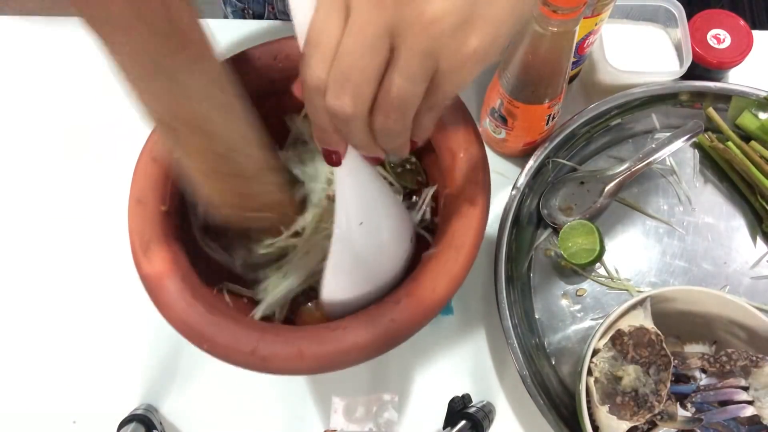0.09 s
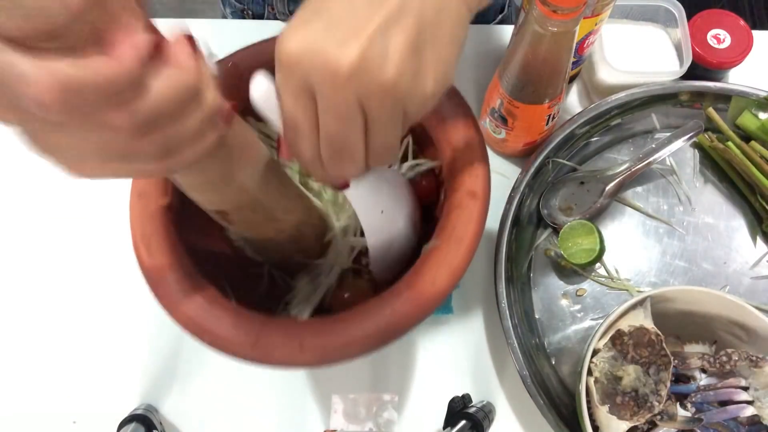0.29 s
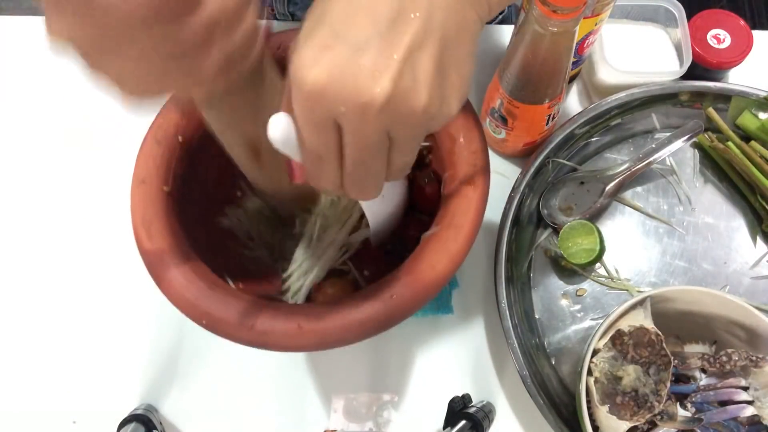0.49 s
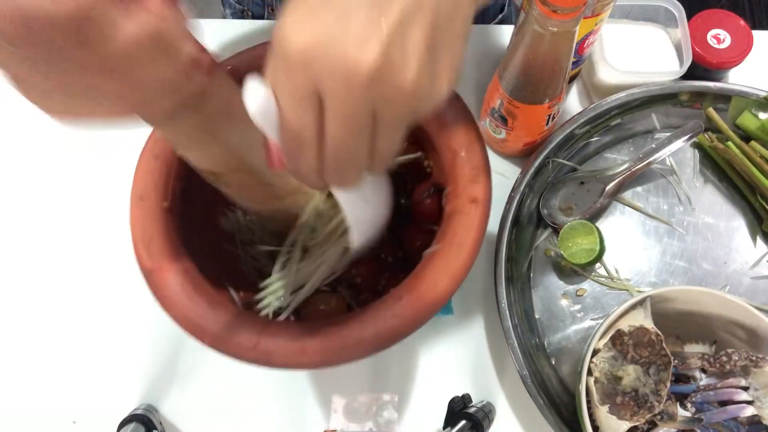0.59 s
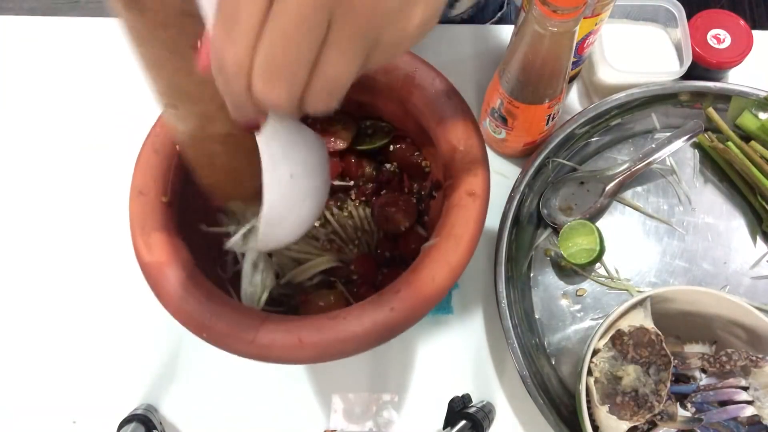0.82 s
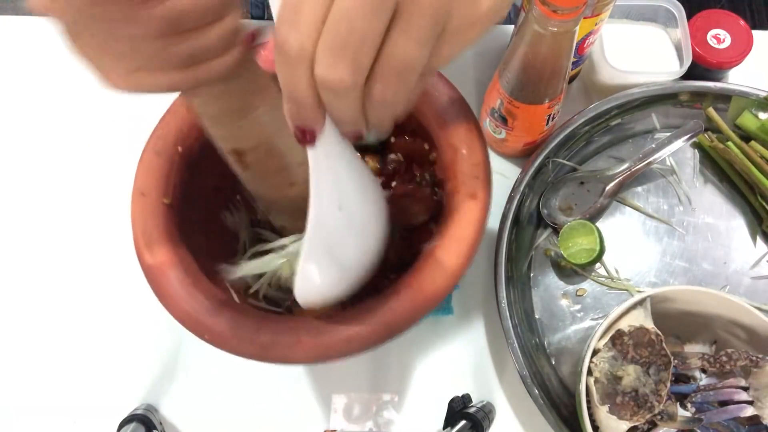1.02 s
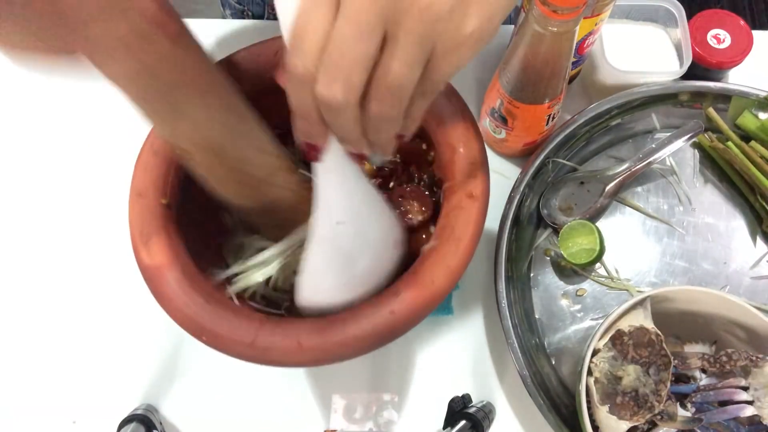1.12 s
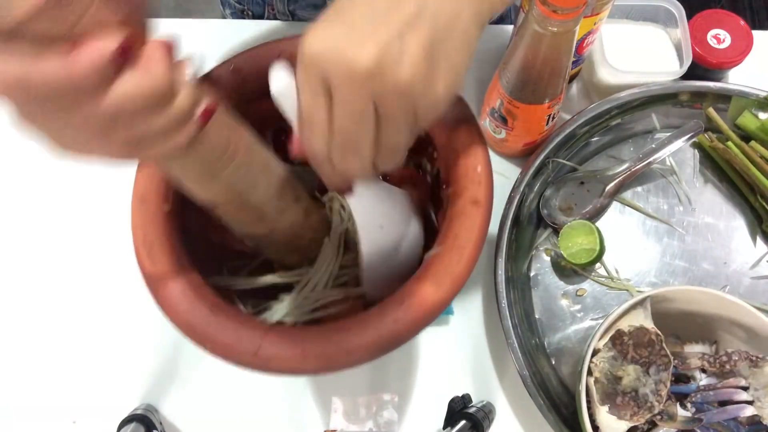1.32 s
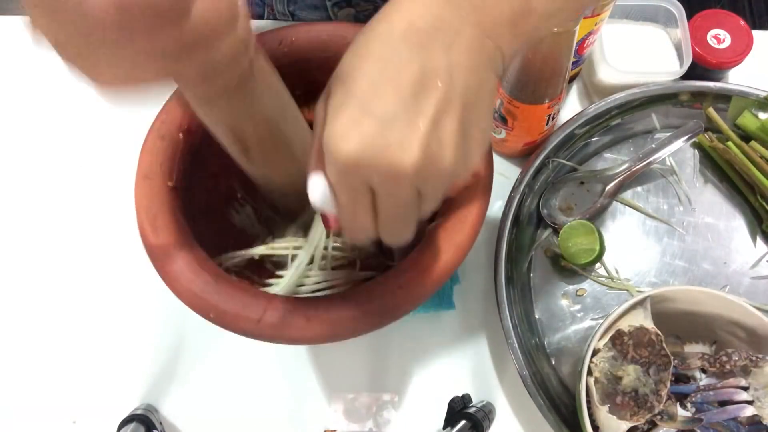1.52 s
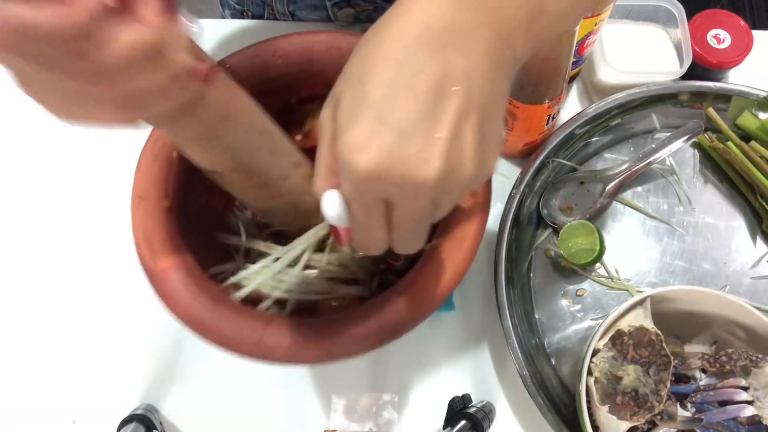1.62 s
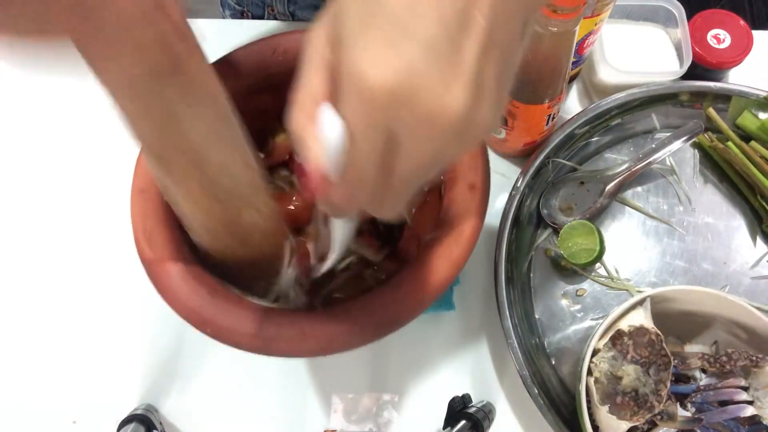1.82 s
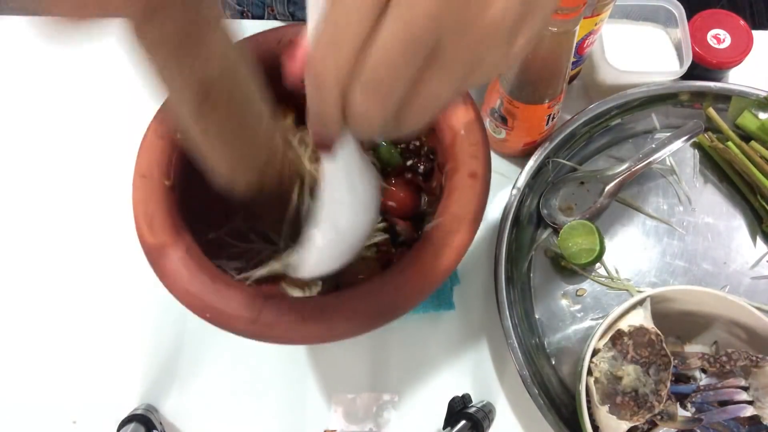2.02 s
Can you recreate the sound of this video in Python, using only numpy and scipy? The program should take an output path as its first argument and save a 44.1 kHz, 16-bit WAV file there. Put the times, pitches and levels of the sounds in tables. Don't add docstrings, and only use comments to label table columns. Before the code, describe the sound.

A spoon strikes a clay mortar: a light tap at 0.1 seconds, the loudest hollow, bell-like clonk at 0.23, quick dull bumps to 0.35. A clear ringing knock follows at 0.8, wet pestle crunch and snaps near 1.07, small clinks around 1.2 to 1.27, a rough scrape at 1.33 to 1.5, another ringing knock at 1.83 and a clicky tap at 1.95. Close, dry, faint kitchen hum.

```python
import sys
import numpy as np
from scipy import signal
from scipy.fft import rfft, irfft, next_fast_len
from scipy.io import wavfile
from scipy.ndimage import uniform_filter1d, map_coordinates

SR = 44100
rng = np.random.default_rng(int(sys.argv[2]) if len(sys.argv) > 2 else 0)


def inscribe(sig):
    pcm = np.round(np.clip(np.atleast_2d(sig).T, -1, 1) * 32767)
    wavfile.write(sys.argv[1], SR, pcm.astype(np.int16))


def makeup_ratio(level_db):
    decades = np.asarray(level_db, float) / 20
    return 10 ** decades


N = 92610


def unit(x):
    return x / np.sqrt(np.mean(x ** 2) + 1e-20)


def along(points, hz):
    f, v = np.transpose(points)
    return np.interp(np.log(hz + 1), np.log(f + 1), v)


def coloured(x, points, tilt_db=0):
    m = next_fast_len(len(x) + 8192)
    hz = np.fft.rfftfreq(m, 1 / SR)
    gain = makeup_ratio(along(points, hz) + tilt_db * np.log2((hz + 1) / 3000))
    return unit(irfft(rfft(x, m) * gain, m)[:len(x)])


def ring(t, hz, db, t60, attack_s=0.0024):
    return makeup_ratio(db - 60 * t / t60) * np.sin(2 * np.pi * hz * t) * (1 - np.exp(-t / attack_s))


def resonate(x, hz, q):
    b, a = signal.iirpeak(hz, q, SR)
    return signal.lfilter(b, a, x)


def add(track, s, sound):
    k = round(s * SR)
    track[k:k + len(sound)] += sound[:N - k]


def grit(n):
    grains_per_s, spread_db, hiss_share = 2500, 3.5, 0.5
    middle_hz, spread_octaves, cycles = 3482, 1.353, 3.4
    u = rng.random((round(n * grains_per_s / SR), 3))
    hz = middle_hz * 2 ** (spread_octaves * rng.standard_normal(len(u)))
    hz = np.clip(hz, 400, 15000)[:, None]
    k = np.arange(96)
    level = makeup_ratio(-spread_db * np.log(u[:, 1:2] + 0.09))
    wiggles = level * np.sin(2 * np.pi * (hz * k / SR + u[:, 2:])) * np.exp(-k * hz / SR / cycles)
    places = (u[:, :1] * n).astype(int) + k
    spec = rfft(np.bincount(places.ravel(), wiggles.ravel())[:n])
    spec /= np.sqrt(np.abs(uniform_filter1d(np.abs(spec) ** 2, size=n // 40)) + 1e-9)
    return unit(irfft(spec, n)) + hiss_share * rng.standard_normal(n)


def mortar():
    # start in seconds, thud in dB, bell in dB, share of the twin mode,
    # seconds it rings freely.
    knocks = [(0, -55, -43, -0.1, 0.096), (0.1146, -25.5, -31, -0.055, 0.29),
              (0.2328, -2.5, -7, -0.02, 0.082), (.303, -19.5, -23.5, -0.3, 0.065),
              (0.348, -23, -48.5, 0, 0.061), (.452, -71, -42, -0.77, 0.065),
              (0.7997, -14.5, -23, 2.5, .255), (1.22, -34, -43.5, -0.1, 0.13),
              (1.256, -28, -39.5, -0.1, 0.089), (1.2714, -17.5, -27.5, 0.64, 0.054),
              (1.83, -11, -24.5, 1.7, .3), (1.954, -27, -83, 4.1, 0.085)]
    # upper ring over the thud in dB, hollow side mode in dB,
    # t60 of the twin in seconds.
    spots = [(-16, -4, .2), (-33.5, -19.5, 0.14), (-7.5, -3.5, 0.6), (-38.5, -32, 0.11), (-37, -24, .3),
             (-30, -20, 0.18), (-9.5, -0.5, 0.12), (-15, -11, 0.24), (-31, -7, 0.15), (-24, -6.5, 0.1),
             (-12.5, 9.5, 0.37), (-38, 10.5, 0.083)]
    hardness = [-6, -2, 0, -18, -15, -10, -3, -14, -12, -16, -17, -6]
    # Hz, level in dB, t60 in seconds.
    thud_modes = [(366, -34.5, 0.49), (404.4, -26, 0.15), (548.4, -16, 0.14), (617, -0.5, 0.022),
                  (766, -8, 0.02), (1162, -6, 0.057), (1640, -8, 0.016), (1713, 7, 0.0027),
                  (1516, -12.5, 0.03), (1937, -12.5, 0.018), (3696, -22, 0.022), (4800, -5.5, 0.0057)]
    # Hz, level in dB, t60 in seconds.
    upper_modes = [(2814, 3.5, 0.056), (2780, -17.5, .25)]
    # Hz, level in dB per Hz.
    crack_colour = [(120, -46.5), (350, -8), (600, 6), (2500, 13), (3500, -10), (8000, -21.5),
                    (16000, -80.5)]
    # Hz, level in dB per Hz.
    table_colour = [(180, -51), (340, -9.5), (600, -6), (900, -9.5), (1700, -18.5), (2500, -47.5)]
    crack_db, crack_t60, crack_rise_s = 1, 0.018, 0.0012
    table_db, table_t60, damped_t60 = -24, 0.36, 0.05
    out, t = np.zeros(N), np.arange(SR // 2) / SR
    for knock, spot, hard_db in zip(knocks, spots, hardness):
        s, thud_db, bell_db, twin, free_s = knock
        upper_db, hollow_db, twin_t60 = spot
        body = np.zeros(len(t))
        for hz, db, t60 in thud_modes:
            bright_db = hard_db * max(np.log2(hz / 1300), 0)
            body += ring(t, hz, db + rng.normal(0, 0.85) + bright_db, t60)
        for hz, db, t60 in upper_modes:
            body += ring(t, hz, db + upper_db, t60)
        crack = coloured(rng.standard_normal(len(t)), crack_colour)
        crack_fade = makeup_ratio(crack_db + hard_db / 2 - 60 * t / crack_t60)
        body += crack_fade * (1 - np.exp(-t / crack_rise_s)) * crack
        body -= ring(t, 966.4, hollow_db, 0.028, 0.0032)
        bell = ring(t, 1087.5, bell_db, 0.62, 0.0015)
        bell += twin * ring(t, 1098, bell_db, twin_t60, 0.0011)
        damping = makeup_ratio(-60 * np.maximum(t - free_s, 0) / damped_t60)
        add(out, s, (makeup_ratio(thud_db) * body + bell) * damping)
        shudder = coloured(rng.standard_normal(len(t)), table_colour)
        add(out, s, makeup_ratio(thud_db + table_db - 60 * t / table_t60) * shudder)
    return out


def bumps():
    # start in seconds, peak in dB, Hz, t60 in seconds.
    notes_of_bowl = [(.1155, -17, 618, 0.029), (.304, -16, 592, 0.071), (.304, -20, 1600, 0.043),
                     (.347, -22.5, 605, 0.11), (.06, -37, 620, .06), (1.075, -28, 653, 0.089),
                     (1.634, -35, 580, 0.047), (1.648, -37.5, 630, 0.085), (1.757, -35, 1020, 0.026),
                     (1.957, -32, 670, 0.075), (1.9533, -15, 1350, .016), (1.9533, -17, 2300, .011),
                     (1.9533, -23, 3600, .01), (0.63, -38, 870, 0.018), (1.0595, -24, 3900, 0.012),
                     (1.6, -23, 3700, 0.014), (.2335, -4.5, 1550, 0.013)]
    out, t = np.zeros(N), np.arange(SR // 8) / SR
    for s, db, hz, t60 in notes_of_bowl:
        add(out, s, ring(t, hz, db, t60))
    return out


def pestle():
    # peak in seconds, level in dB, rise in seconds, fall in seconds, tilt in dB per octave.
    blows = [(0.046, -30.5, 0.036, 0.014, 0), (0.163, -46.5, 0.028, 0.017, -2.5),
             (.335, -38.5, 0.019, 0.019, 3), (0.59, -36, 0.03, 0.029, 0), (.695, -50.5, 0.019, 0.024, -2.5),
             (1.058, -38.5, 0.0099, 0.012, 3.5), (1.079, -29.5, 0.016, 0.017, -0.5),
             (1.184, -43.5, 0.0072, 0.017, -1.5), (1.329, -37, 0.0019, 0.03, 4),
             (1.371, -30.5, 0.013, 0.019, -2), (1.41, -42, 0.054, 0.082, 2), (1.64, -34.5, 0.024, 0.023, 1),
             (1.745, -44, 0.02, 0.0096, -4.5), (1.936, -47, .006, 0.12, 2), (1.98, -33, 0.025, 0.015, 0)]
    # Hz, level in dB per Hz.
    salad_colour = [(180, -61), (300, -22), (433, -29.5), (616, -5.5), (920, -10), (1800, -4.5), (2270, -4),
                    (14300, -23.5), (16400, -30)]
    clump_db, clumps_per_s = 2.5, 70
    lead = SR // 4
    out, t = np.zeros(N + SR), np.arange(-lead, lead) / SR
    for s, db, rise, fall, tilt_db in blows:
        shape = np.exp(-np.abs(t / np.where(t < 0, rise, fall)) ** 1.21)
        k = round(s * SR)
        out[k:k + len(t)] += makeup_ratio(db) * shape * coloured(grit(len(t)), salad_colour, tilt_db)
    steps = rng.standard_normal(round(N * clumps_per_s / SR) + 4)
    clumps = map_coordinates(steps, [np.arange(N) * clumps_per_s / SR])
    return out[lead:lead + N] * makeup_ratio(clump_db * clumps)


def scrape():
    # time in seconds, level in dB.
    drag_level = [
        (1.318, -74),
        (1.326, -41),
        (1.37, -34.5),
        (1.41, -35),
        (1.45, -47.5),
        (1.48, -53.5),
        (1.521, -49.5),
        (1.57, -71),
    ]
    # Hz, width in Hz, level in dB.
    sung_modes = [(1092, 29, -3), (2840, 130, -2), (4060, 820, 5), (5730, 220, 1.5), (6260, 250, -7.5),
                  (7210, 200, -12)]
    s, db = np.transpose(drag_level)
    drag, sung = grit(N), np.zeros(N)
    for hz, width_hz, level in sung_modes:
        sung += makeup_ratio(level) * unit(resonate(drag, hz, hz / width_hz))
    return makeup_ratio(np.interp(np.arange(N) / SR, s, db, -120, -120)) * unit(sung)


def snaps():
    # start in seconds, peak in dB, Hz, t60 in seconds.
    short_snaps = [(0.05, -33, 2020, 0.0075), (.17, -37, 4560, 0.014), (.2, -43, 4800, 0.0052),
                   (0.327, -16.5, 5400, 0.0079), (0.34, -15.5, 2800, 0.021), (0.694, -33, 3270, 0.014),
                   (.918, -51, 4000, 0.011), (0.945, -45.5, 8350, 0.018), (1.0607, -17, 4570, 0.0041),
                   (1.08, -28, 1430, 0.0055), (1.1605, -41, 5900, .005), (1.17, -36, 5000, 0.0054),
                   (1.284, -36, 9100, 0.021), (1.631, -30, 660, 0.052), (1.6457, -28, 1490, 0.013),
                   (1.693, -42, 7800, 0.016), (1.757, -29, 2760, 0.0024), (1.9535, -22, 1500, .02),
                   (1.9537, -24, 3000, .012), (.5517, -46, 1950, 0.0078), (0.5779, -45, 1860, .012),
                   (1.184, -41, 1280, 0.0089), (1.192, -36, 1500, .015), (1.203, -39, 700, 0.029),
                   (1.266, -38, 4560, 0.015), (1.2794, -43, 2800, .01), (1.3642, -22.5, 2830, .015),
                   (1.372, -23.5, 2540, 0.0036), (1.624, -40, 1600, .01), (.1155, -34.5, 2200, .012),
                   (1.038, -47, 11400, 0.029), (1.173, -34, 1480, 0.017), (1.075, -51, 630, 0.031),
                   (1.055, -37.5, 140, 0.046), (0.566, -28, 2700, 0.0095), (0.6173, -29.5, 1950, 0.046),
                   (1.2042, -37.5, 9500, 0.013), (1.882, -42, 1480, 0.019), (.1155, -24, 754, 0.025),
                   (1.3462, -23.5, 11100, .012), (1.408, -36.5, 11800, 0.11), (1.898, -58, 4530, 0.0066)]
    tip = 2.5
    out, t = np.zeros(N), np.arange(SR // 8) / SR
    for s, db, hz, t60 in short_snaps:
        push = rng.standard_normal(len(t)) * (1 + tip * np.exp(-t * hz))
        body = resonate(resonate(push, hz, 2.2) + 0.034 * push, hz, 2.2)
        snap = makeup_ratio(-60 * t / t60) * body
        add(out, s, makeup_ratio(db) * snap / np.abs(snap).max())
    return out


def clinks():
    # start in seconds, level in dB, favoured Hz, share of the full ring length.
    touches = [(0.1147, -40, 8800, 0.31), (1.2022, -37, 10000, .6), (1.215, -48, 9500, .7),
               (1.2385, -48, 9000, .3), (1.245, -46, 7000, .3), (1.2555, -45, 6500, .25),
               (1.272, -44, 5860, 0.74), (1.329, -33, 2970, 0.64), (1.408, -42.5, 6000, 0.4),
               (1.929, -55, 6800, 0.51), (1.9545, -27, 6300, .25), ]
    # Hz, level in dB, t60 in seconds.
    high_modes = [(2900, 0.5, 0.097), (3600, 1.5, 0.048), (5830, -1.5, 0.11), (8190, -4.5, 0.097),
                  (10750, -2.5, .03), (12000, -7, 0.044), (13500, -8, .03), (15300, -6, .025)]
    focus_db, roughness = 13, 1.1
    out, t = np.zeros(N), np.arange(SR // 8) / SR
    for s, db, centre_hz, life in touches:
        flutter = uniform_filter1d(rng.standard_normal((len(high_modes), len(t))), size=90)
        rough = 1 + roughness * unit(flutter)
        for (hz, level, t60), r in zip(high_modes, rough):
            detune, scatter = rng.standard_normal(2)
            mode_db = db + level - focus_db * np.log2(hz / centre_hz) ** 2 + 2 * scatter
            add(out, s, r * ring(t, hz * (1 + 0.0098 * detune), mode_db, t60 * life, 0.0001))
    return out


def rustle():
    # time in seconds, level in dB.
    slide_level = [(0.0, -53), (0.21, -58.5), (0.33, -40.5), (0.45, -53.5), (0.68, -61), (0.781, -59.5),
                   (0.86, -72), (1.05, -68.5), (1.09, -60.5), (1.19, -55), (1.24, -62.5), (1.46, -51.5),
                   (1.75, -55.5), (2.1, -53.5)]
    # Hz, level in dB per Hz.
    shred_colour = [(760, -9.5), (1300, -4), (1410, -8.5), (1620, -8.5), (3910, -9), (11300, -24),
                    (16400, -34)]
    s, db = np.transpose(slide_level)
    flutter = map_coordinates(rng.standard_normal(200), [np.arange(N) * 40 / SR])
    level = makeup_ratio(np.interp(np.arange(N) / SR, s, db) + 4.5 * flutter)
    return level * coloured(grit(N) + 0.95 * rng.standard_normal(N), shred_colour)


def room(x):
    # Hz, t60 in seconds.
    decay = [(300, 0.21), (2000, 1), (10000, 0.033)]
    hz, t, z = signal.stft(rng.standard_normal(SR // 2), SR, nperseg=256)
    tail = signal.istft(z * makeup_ratio(-60 * t / along(decay, hz)[:, None]), SR, nperseg=256)[1]
    late = np.pad(x, (200, 0))
    return signal.fftconvolve(late, tail / np.linalg.norm(tail))[:N]


def kitchen():
    # Hz, level in dB per Hz.
    hum_colour = [(20, -23), (55, 13.5), (124, 8), (251, 5), (1590, -4.5), (2260, -34.5), (5830, -9.5),
                  (15100, -43), (16400, -30)]
    # Hz, width in Hz, level in dB.
    bowl_air = (615, 40, -65)
    hz, width_hz, db = bowl_air
    hum = makeup_ratio(-59) * coloured(rng.standard_normal(N), hum_colour)
    hollow = makeup_ratio(db) * unit(resonate(rng.standard_normal(N), hz, hz / width_hz))
    motor = makeup_ratio(-65.5) * np.sin(2 * np.pi * 140 * np.arange(N) / SR)
    return hum + hollow + motor


def scene():
    near = mortar() + bumps() + pestle() + scrape() + snaps() + clinks()
    return (near + makeup_ratio(-34) * room(near) + rustle() + kitchen())[None]


def low_pass(x):
    return signal.sosfilt(signal.butter(12, 16500, fs=SR, output="sos"), x)


def record(dry):
    low_hz, top_hz = 60, 16300
    hz = np.fft.rfftfreq(N, 1 / SR)
    response = (hz < top_hz) / np.sqrt(1 + (low_hz / (hz + 1)) ** 4)
    x = irfft(rfft(dry) * response, N)
    mix = x / (1 + np.abs(x) ** 10) ** (1 / 10)
    return low_pass(mix)


dry = scene()
out = record(dry)
inscribe(out)
```